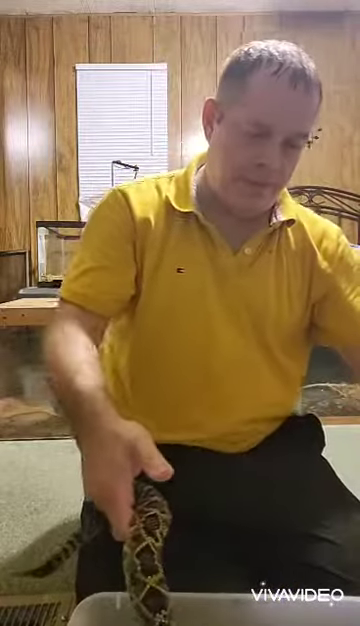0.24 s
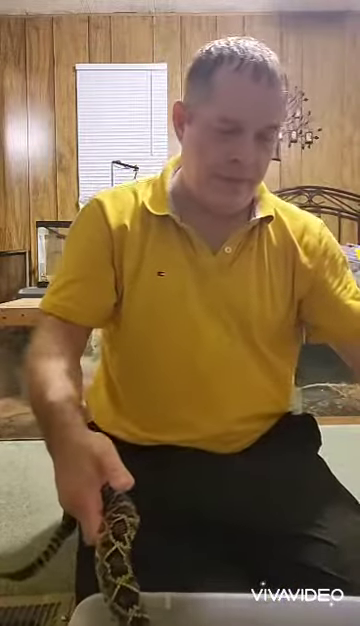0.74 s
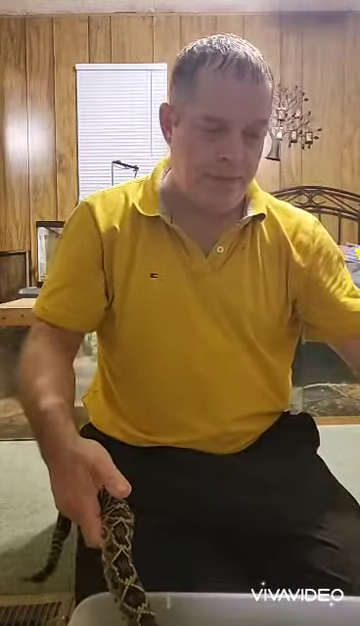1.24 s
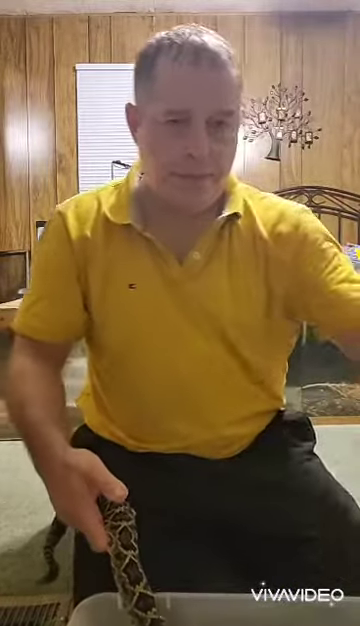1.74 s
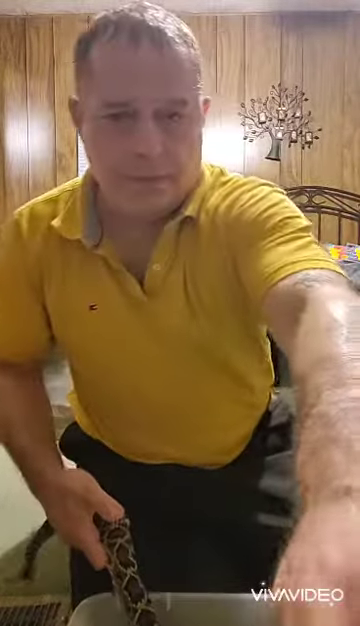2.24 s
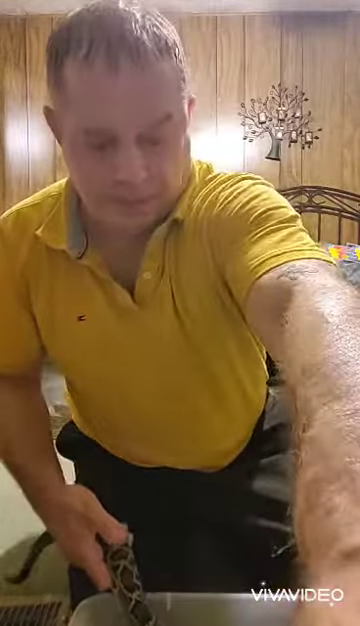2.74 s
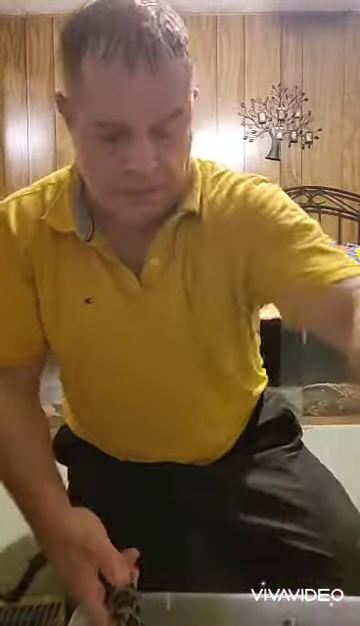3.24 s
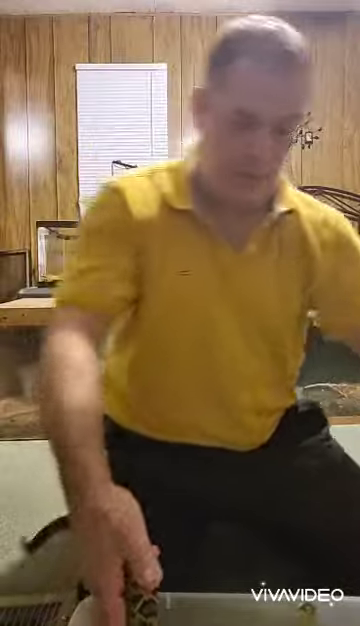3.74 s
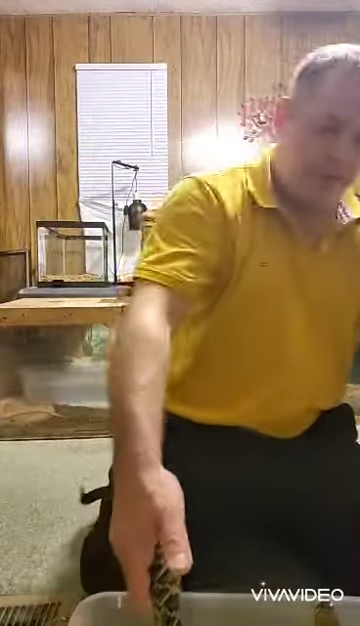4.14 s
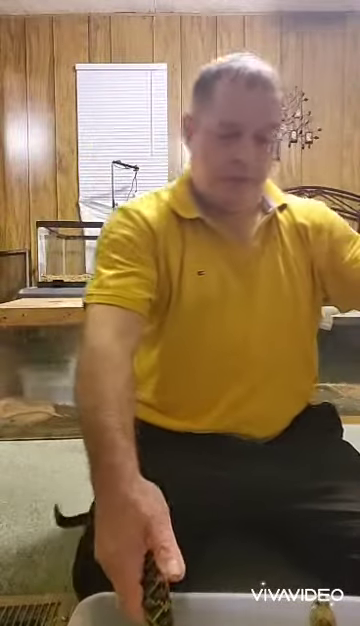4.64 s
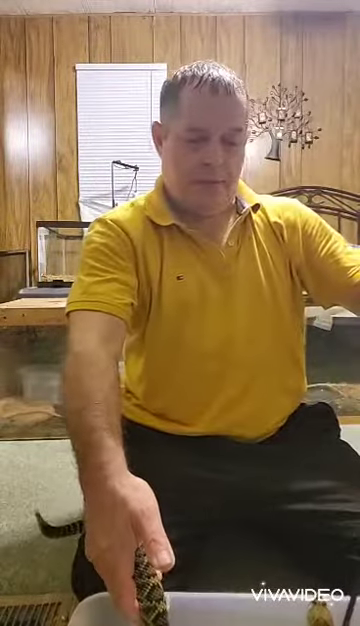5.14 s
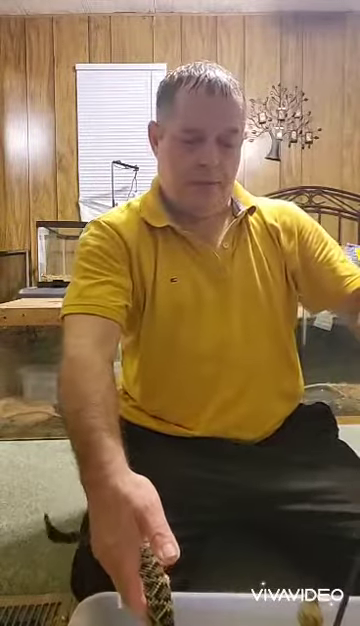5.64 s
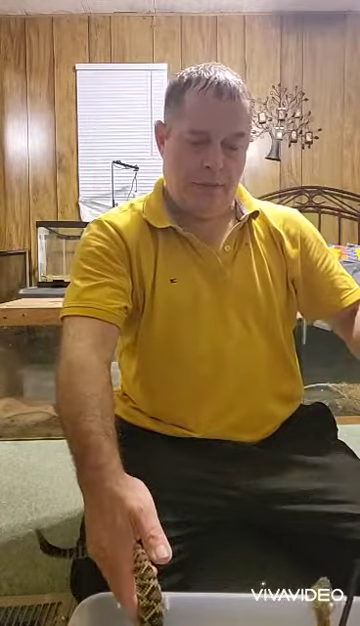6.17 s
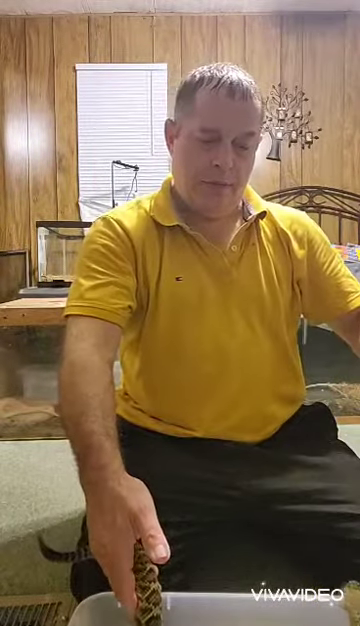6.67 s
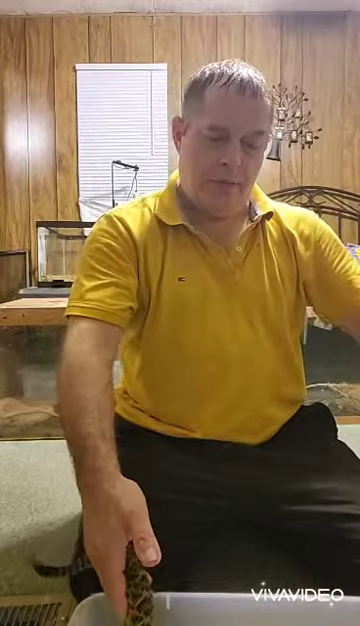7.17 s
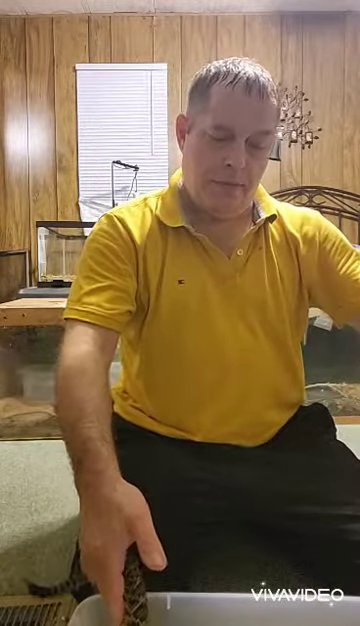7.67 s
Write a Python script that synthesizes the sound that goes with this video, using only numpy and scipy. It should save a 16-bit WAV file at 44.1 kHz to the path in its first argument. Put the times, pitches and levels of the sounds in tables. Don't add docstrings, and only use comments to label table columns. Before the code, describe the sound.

Close stereo pickup in a small panelled room. Soft cloth rustle and light taps over a faint low hum, then a hard hollow knock on a plastic tub at about one second. At two seconds a snake's tail starts a dry, hissy rattle, about twenty pulses a second, quickly loud and sustained to the end, with a few scrapes and knocks underneath until five seconds.

```python
import sys
import numpy as np
from scipy import signal
from scipy.io import wavfile
from scipy.ndimage import uniform_filter1d

SR = 44100
rng = np.random.default_rng(int(sys.argv[2]) if len(sys.argv) > 2 else 0)


def generate_wav(signal):
    frames = np.transpose(np.atleast_2d(signal))
    scaled = np.clip(frames, -1, 1) * 32767
    pcm = np.round(scaled).astype(np.int16)
    wavfile.write(sys.argv[1], SR, pcm)


def field_ratio(decibels):
    return 10 ** (np.asarray(decibels, dtype=float) / 20)


N = 348831


def evened(x):
    return x / np.sqrt(np.mean(x ** 2) + 1e-20)


def smooth(x, size, axis=-1):
    return uniform_filter1d(x, size=size, axis=axis)


def read(points, hz):
    f, value = np.transpose(points)
    return np.interp(np.log(hz + 1), np.log(f + 1), value)


def curve(rows, col):
    rows = np.array(rows)
    return np.interp(np.arange(N) / SR, rows[:, 0], rows[:, col], -140.0, -140.0)


def add(mix, s, sound):
    part = mix[..., round(s * SR):][..., :sound.shape[-1]]
    part += sound[..., :part.shape[-1]]


def colour(x, points):
    hz = abs(np.fft.fftfreq(4096, 1 / SR))
    log_gain = np.log(field_ratio(np.maximum(read(points, hz), -100)))
    phase = -signal.hilbert(log_gain).imag
    taps = np.fft.ifft(np.exp(log_gain + 1j * phase)).real[:2048]
    return signal.oaconvolve(x, taps)[:len(x)]


def resonate(x, hz, width):
    r = np.exp(-np.pi * width / SR)
    return 2 * signal.lfilter([1 - r], [1, -r * np.exp(2j * np.pi * hz / SR)], x).real


def resonant_noise(x, hz, width):
    return evened(resonate(resonate(x, hz, width), hz, width))


# (frequency [Hz], correlation [-1 to 1])
LIKENESS = [(60, 0.93), (150, 0.62), (380, 0.85), (950, -0.25), (2380, 0.069), (5980, -0.31),
            (15000, -0.002)]


def correlated(left, other, hz):
    same = np.clip(read(LIKENESS, hz), -1, 1)[:, None]
    return np.array([left, same * left + np.sqrt(1 - same ** 2) * other])


def hiss(points, patchy_db, size=1024):
    hop, hz = size // 4, np.fft.rfftfreq(size, 1 / SR)
    a, b, c, d, patches = rng.standard_normal((N // hop + 5, len(hz), 5)).T
    patches = evened(smooth(smooth(patches, 10, axis=0), 10, axis=1))
    z = correlated(a + 1j * b, c + 1j * d, hz)
    z *= field_ratio(read(points, hz)[:, None] + patchy_db * patches)
    return signal.istft(z, nperseg=size, noverlap=size - hop)[1][:, :N]


# (frequency [Hz], density [dB per Hz])
AIR_SPECTRUM = [(22, -33), (35, -42), (45, -5), (100, -4.5), (180, -13), (290, -16.5), (360, -29),
                (600, -31.5), (1500, -34.5), (2300, -34.5), (3200, -41), (7500, -36), (9500, -47),
                (15000, -41.5), (16000, -33)]
# (frequency [Hz], level [dB])
MOTOR_HUM = [(58.3, -50.5), (119.9, -60), (192, -93.5), (239.8, -71)]
# (frequency [Hz], width [Hz], level [dB])
DUCT_RUMBLE = [(48.25, 8, -57), (87.8, 24.4, -59.5), (145, 31, -77)]


def house():
    air = hiss(AIR_SPECTRUM, patchy_db=4.0, size=2048)
    upper = signal.sosfilt(signal.butter(4, 150, "high", fs=SR, output="sos"), air)
    t = np.arange(N) / SR
    hum = sum(field_ratio(db) * np.sqrt(2) * np.sin(2 * np.pi * hz * t) for hz, db in MOTOR_HUM)
    rumble = sum(field_ratio(db) * resonant_noise(rng.standard_normal(N), hz, width) for hz, width, db in DUCT_RUMBLE)
    return field_ratio(-64.5) * air / upper.std() + hum + rumble


# (time [s], level [dB])
BRUSH_LEVEL = [
    (0.0, -66),
    (0.29, -65.5),
    (0.82, -78),
    (1.02, -68),
    (1.37, -79),
    (1.5, -115),
    (1.79, -75),
    (2.02, -69),
    (2.1, -86),
]
# (frequency [Hz], density [dB per Hz])
BRUSH_SPECTRUM = [(1470, -52), (2500, -48), (4020, -4), (4690, 0.5), (7530, 10), (9290, -5), (14900, -4),
                  (16000, -2)]


def brush():
    return field_ratio(curve(BRUSH_LEVEL, 1) + 2.0) * evened(hiss(BRUSH_SPECTRUM, patchy_db=4.5))


# (time [s], level [dB], squeak over rub [dB])
STROKES = [
    [(0.0, -61.5, -2), (0.33, -64, -20), (0.454, -64.5, -10), (0.62, -86, -14)],
    [(0.95, -75, 9), (1.068, -60.5, -5), (1.098, -57, -3), (1.112, -47, 1), (1.16, -66, -2),
     (1.24, -68, -1)],
    [(2.28, -71, -4), (2.336, -71, -69), (2.488, -53.5, -1), (2.644, -54, 0), (3.126, -59.5, -1),
     (3.5, -48.5, -22), (3.63, -51, -17), (3.75, -92, -11)],
    [(3.9, -77, -9), (3.98, -73, -19), (4.14, -56, -3), (4.16, -46.5, -11), (4.3, -55.5, -9),
     (4.42, -78, -1.5)],
    [(4.79, -54, -6), (4.805, -51, -23), (4.88, -67.5, -3), (4.954, -69.5, 0), (5.1, -73.5, 3)],
]
# (frequency [Hz], density [dB per Hz])
RUB_SPECTRUM = [(100, -3.5), (250, -7.5), (450, -8.5), (660, -5.5), (850, -9.5), (2200, -15.5), (3500, -13),
                (5500, -10.5), (9000, -75)]
# (frequency [Hz], width [Hz], level [dB])
SQUEAK_MODES = [(456, 52, -1.5), (854, 47, -16), (1262, 90, -2), (1684, 420, 2.5), (2084, 305, 7),
                (2560, 1800, -2)]


def slides():
    grit = field_ratio(0.21 * evened(smooth(rng.standard_normal(N), 500)))
    rub = evened(hiss(RUB_SPECTRUM, patchy_db=2.5, size=512)) * grit
    squeak = evened(sum(field_ratio(db) * resonant_noise(rub, hz, width) for hz, width, db in SQUEAK_MODES))
    return sum(field_ratio(curve(rows, 1)) * (rub + field_ratio(curve(rows, 2)) * squeak) for rows in STROKES)


# (frequency [Hz], decay time t60 [s])
ROOM_DECAY = [(200, 0.065), (1000, 0.24), (4000, 0.23), (8000, 0.14), (16000, 0.21)]


def tail():
    taps = np.zeros((2, SR // 4))
    slots = np.arange(150, SR // 4 - 20, 20)
    at = slots + rng.integers(0, 20, (2, len(slots)))
    np.put_along_axis(taps, at, rng.choice([-1., 1.], at.shape), 1)
    hz, t, z = signal.stft(taps, SR, nperseg=256)
    z = correlated(z[0], z[1], hz)
    decay = field_ratio(-60 * t / read(ROOM_DECAY, hz)[:, None])
    taps = signal.istft(z * decay, SR, nperseg=256)[1]
    return taps / np.linalg.norm(taps[0])


def room(x, wet_db):
    return x + field_ratio(wet_db) * signal.oaconvolve(x, tail(), axes=1)[:, :N]


def ring_of(modes, contact, pitch):
    t = np.arange(len(contact)) / SR
    response = sum(field_ratio(db - 60 * t / t60) * np.sin(2 * np.pi * hz * pitch * t) for hz, db, t60 in modes)
    onset = 1 - np.exp(-t / 0.0012)
    sound = signal.fftconvolve(response * onset, contact)[:len(t)]
    return sound / abs(sound).max()


# (time [s], peak [dB], pitch factor)
FINGER_TAPS = [(0.085, -54, 1.03), (0.264, -57, 1.01), (0.308, -51.5, 1.01), (0.647, -66, 1.04),
               (0.988, -60, 1.14), (1.042, -51, 1.07), (1.066, -46.5, 1.12), (2.376, -56.5, 0.91),
               (4.209, -55, 1.23), (4.245, -50, 0.96), (4.284, -66, 1.1), (4.839, -51.5, 1),
               (0.441, -49.5, 1.35), (2.0113, -62.5, 2)]
# (time [s], peak [dB], thud [dB], pitch factor)
RIM_SNAPS = [
    (1.115, -36, -10, 0.99),
    (2.469, -41, -1, 0.6),
    (2.498, -41.5, -5, 1.3),
    (2.506, -33, -18, 1.01),
    (2.514, -36.5, -27, 0.87),
    (4.168, -37, -26, 0.97),
]
# (time [s], peak [dB], crack [dB], thud [dB], pitch factor)
HAND_BLOWS = [
    (1.099, -25, -12, -5, 1.002),
    (4.1494, -28, -18, -9.5, 1.002),
    (4.797, -40.5, -2.5, 3, 0.99),
]
# (time [s], peak [dB], thud [dB], contact [s], pitch factor)
TUB_SETTLES = [
    (2.521, -43, -15, 0.033, .85),
    (3.971, -61, 14, 0.06, .65),
]


def contacts():
    rows = [(s, db, -15, -4.5, 0.024, pitch) for s, db, pitch in FINGER_TAPS]
    for s, db, crack_db, thud_db, pitch in HAND_BLOWS:
        rows.append((s, db, crack_db, thud_db, 0.0014, pitch))
        rows.append((s + 0.0052, db - 0.7, crack_db, thud_db, 0.0014, pitch))
    rows += [(s, db, -13, thud_db, 0.0021, pitch) for s, db, thud_db, pitch in RIM_SNAPS]
    rows += [(s, db, -26, thud_db, length, pitch) for s, db, thud_db, length, pitch in TUB_SETTLES]
    return rows


# (frequency [Hz], level [dB], decay time t60 [s])
WALL_MODES = [(420, -5, 0.071), (657, 4.5, 0.043), (617, 6, 0.043), (797, -1, 0.05), (970, -5, 0.034),
              (1380, -12.5, 0.038), (2060, -10, 0.023)]
# (frequency [Hz], level [dB], decay time t60 [s])
FLOOR_MODES = [(136, -12, 0.23), (224, 5, 0.041), (305, 2.5, 0.068)]
# (frequency [Hz], density [dB per Hz])
CRACK_SPECTRUM = [(590, -28), (1000, -19), (1890, -10.5), (2070, -12), (3070, -13.5), (5560, -13),
                  (9650, -31), (12000, -43), (15600, -47), (22000, -120)]


def knocks():
    body, cracks, t = np.zeros(N), np.zeros((2, N)), np.arange(SR // 6) / SR
    for s, db, crack_db, thud_db, length, pitch in contacts():
        start = s - 0.0025
        chance = rng.standard_normal((3, len(t)))
        contact = chance[0] * np.exp(-(t / length) ** 4)
        crack = evened(np.array([colour(c, CRACK_SPECTRUM) for c in chance[1:]])) * np.exp(-t / 0.015)
        add(body, start, field_ratio(db) * ring_of(WALL_MODES, contact, pitch))
        add(body, start, field_ratio(db + thud_db) * ring_of(FLOOR_MODES, contact, 0.91))
        add(cracks, start, field_ratio(db + crack_db) * crack)
    return room(body + cracks, wet_db=-8.0)


# (start [s], swings [count], first peak [dB], change per swing [dB])
SHAKING_BOUTS = [(2.082, 3, -32, -4), (2.236, 6, -26, 1.2), (2.536, 4, -23, 0.9), (2.723, 6, -21.5, -1.24),
                 (3.022, 5, -26.5, 0.45), (3.243, 5, -22.5, -1.06), (3.473, 4, -27.5, -0.24),
                 (3.679, 3, -27.5, -1.5), (3.827, 5, -26, 0.2), (4.054, 2, -25, 0), (4.209, 3, -22, -4),
                 (4.361, 3, -25.5, 0.15), (4.549, 7, -24.5, -0.8), (4.887, 3, -25.5, -0.5),
                 (5.038, 3, -24, -2.7), (5.16, 2, -25, 3.5), (5.286, 4, -24, -0.6), (5.5, 5, -23, -1.2),
                 (5.794, 2, -26, -4), (5.897, 4, -25.5, 0), (6.098, 6, -23, -0.8), (6.385, 4, -24.5, -1.5),
                 (6.591, 6, -25.5, -0.1), (6.885, 2, -26, 4.5), (6.994, 2, -26, -13.5),
                 (7.092, 1, -29.5, 0.1), (7.187, 2, -27.5, -3.5), (7.301, 1, -26.5, 0.1),
                 (7.402, 5, -28.5, -1.33), (7.678, 4, -27, -0.3)]


def swings():
    rows = []
    ends = [bout[0] for bout in SHAKING_BOUTS[1:]] + [7.912]
    for (s, count, first_db, step_db), end in zip(SHAKING_BOUTS, ends):
        k = np.arange(max(round(count), 1))
        gap = (end - s) / len(k)
        db = first_db + step_db * k - 2 * (k % 2)
        hold = min(0.55 * gap, 0.034) * np.exp(-0.03 * (db + 25))
        rows += zip(s + k * gap, db, hold, np.full(len(k), -1.7))
    return rows


# (time [s], peak [dB])
LOOSE_TICKS = [
    (1.3733, -52.5),
    (1.6392, -83),
    (2.042, -52),
]


def swing_force():
    rise_s, sag_s, fall_s = 0.0011, 0.056, 0.023
    force, bright, t = np.full(N, 1e-6), np.full(N, 1e-6), np.arange(SR // 6) / SR
    for s, db, length, bright_db in swings() + [(s, db, 0.001, -16) for s, db in LOOSE_TICKS]:
        held = np.exp(-t / sag_s - np.maximum(t - length, 0) / fall_s)
        first_clash = 1 + 0.42 * np.exp(-t / 0.0091)
        shape = (1 - np.exp(-t / rise_s)) * held * first_clash
        add(force, s - 0.003, field_ratio(db) * shape)
        add(bright, s - 0.003, field_ratio(db + bright_db) * shape)
    return force, bright


def near(db, count=8):
    taps, at = np.zeros((2, 320)), rng.integers(8, 320, (2, count))
    echoes = field_ratio(db) * rng.choice([-1., 1.], at.shape) * np.exp(-at / 500.0)
    np.put_along_axis(taps, at, echoes, 1)
    taps[:, 0] = 1
    return taps


SEGMENT_RING = [5440, 6450, 6390, 6690, 6870, 7130, 7670, 7500, 7780, 7840, 8040, 8270]
# (frequency [Hz], density [dB per Hz])
SHELL_SPECTRUM = [(1500, -39.5), (2500, -35), (3400, -28), (4000, -19.5), (5500, -19.5), (6600, -10),
                  (7100, -11), (7750, -5.5), (8700, -13.5), (10000, -16.5), (11300, -19), (13400, -16),
                  (15200, -13.5), (16000, -19.5)]


def segment_paths():
    u, paths = np.arange(400) / SR, []
    for hz in SEGMENT_RING:
        ring = np.exp(-u / 0.0012) * np.cos(2 * np.pi * hz * u) * 0.12 + (u == 0)
        path = field_ratio(-1.5) * 2.37 * tail()
        add(path, 0, near(db=-3.0))
        paths.append([colour(signal.fftconvolve(port, ring), SHELL_SPECTRUM) for port in path])
    return np.array(paths) / np.sqrt(np.sum(np.square(paths)) / (2 * len(paths)))


def rattle(ticks_per_s=1900.0, spread_db=4.0, clump_db=2.5):
    force, bright = swing_force()
    ticks = field_ratio(spread_db * np.minimum(rng.exponential(1, N), 3.9)) * (rng.random(N) < ticks_per_s / SR)
    clumps = evened(smooth(smooth(rng.standard_normal(N), 130), 60))
    ticks = ticks * field_ratio(clump_db * np.clip(clumps, -3, 1.5)) * rng.choice([-1., 1.], N)
    ticks = force * evened(ticks)
    drift = np.round(1.7 * evened(smooth(clumps[::-1], 1500)))
    last = len(SEGMENT_RING) - 1
    segment = np.clip(rng.integers(0, last + 1, N) + drift, 0, last)
    clatter = np.zeros((2, N))
    for k, path in enumerate(segment_paths()):
        clatter += signal.oaconvolve((ticks * (segment == k))[None], path)[:, :N]
    top = signal.sosfiltfilt(signal.butter(4, 10500, "high", fs=SR, output="sos"), clatter)
    left, right = field_ratio(-7.0) * (clatter + top * (bright / force - 1))
    return np.array([np.roll(left, shift=6), right])


def scene():
    return house() + brush() + slides() + knocks() + rattle()


# (frequency [Hz], depth [dB])
GATE_DEPTH = [(700, 60), (1000, 39), (2000, 38), (2400, 29), (3000, 24.5), (3600, 18), (4400, 16),
              (5000, 60), (9800, 60), (10400, 19), (12400, 18), (13000, 60)]


def gated(x, unsure_db=4.5):
    hz, t, z = signal.stft(x, SR, nperseg=2048, noverlap=1536)
    bands = (abs(z[:, :1024]) ** 2).mean(axis=0).reshape(128, 8, -1).mean(axis=1)
    rattle_power = bands[36:52].mean(axis=0)
    under_db = 10 * np.log10(smooth(rattle_power / (bands + 1e-20), 3, axis=1))
    chance = evened(smooth(rng.standard_normal((len(t), 128)).T, 5, axis=1))
    kept = under_db + unsure_db * chance < read(GATE_DEPTH, hz[4:1024:8])[:, None]
    z[:, :1024] *= np.repeat(kept, 8, axis=0)
    return signal.istft(z, SR, nperseg=2048, noverlap=1536)[1][:, :N]


def top_cut(x):
    return signal.sosfilt(signal.butter(12, 16300, fs=SR, output="sos"), x)


# (frequency [Hz], left minus right [dB])
PORT_DIFFERENCE = [(60, 1.5), (700, 1), (1300, 5), (2400, 2), (4400, -1.5), (7000, -8.5), (9000, -4),
                   (11500, 5), (13000, -5), (15500, -3.5)]


def record(dry):
    ports = []
    for x, side in zip(dry, (1, -1)):
        ports.append(colour(x, [(hz, side * db / 2) for hz, db in PORT_DIFFERENCE]))
    low_pass = signal.firwin(511, 15480, window=("kaiser", 9), fs=SR)
    limited = signal.oaconvolve(np.array(ports), low_pass[None], "same")
    return top_cut(gated(limited))


dry = scene()
out = record(dry)
generate_wav(out)
```